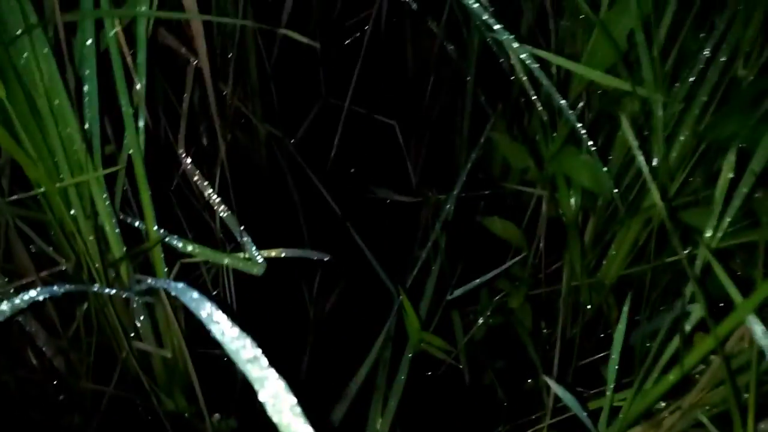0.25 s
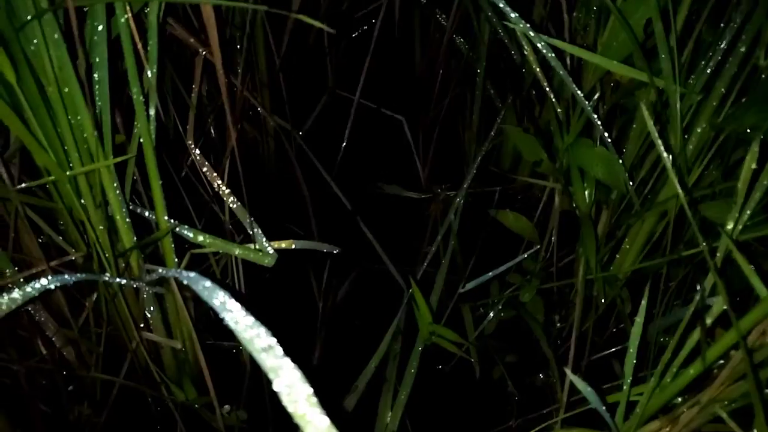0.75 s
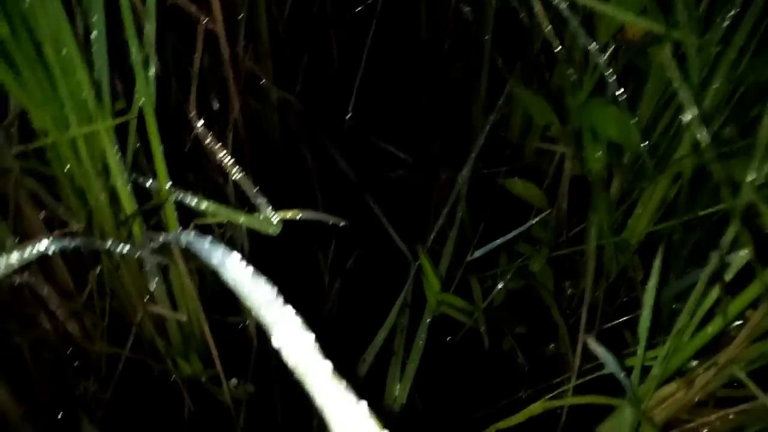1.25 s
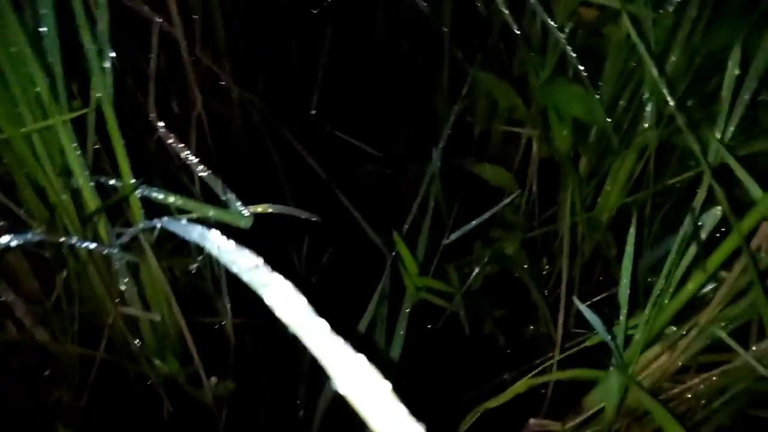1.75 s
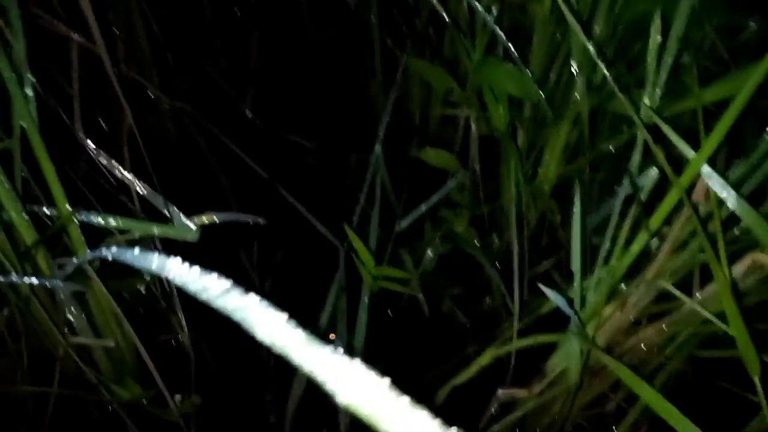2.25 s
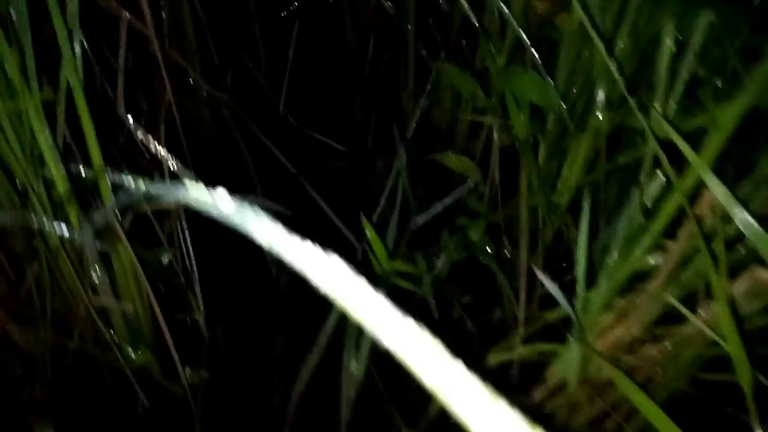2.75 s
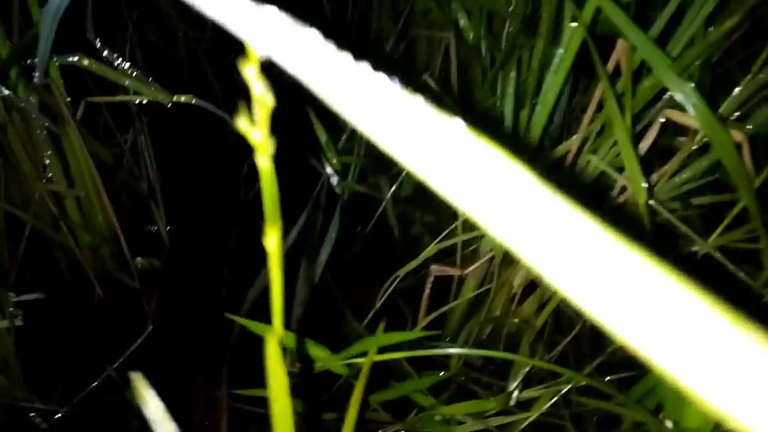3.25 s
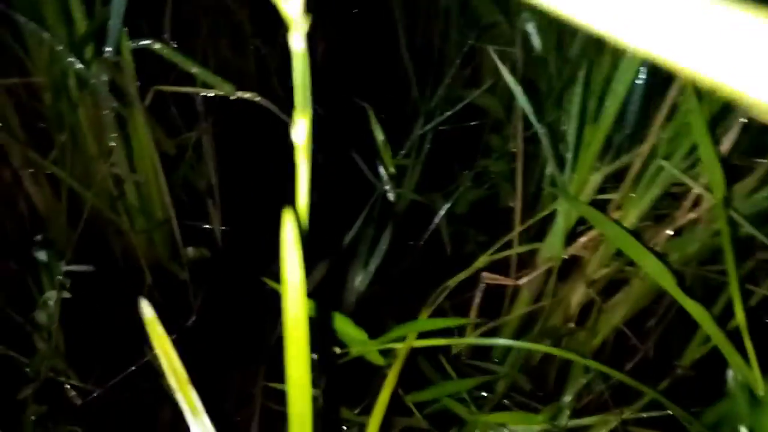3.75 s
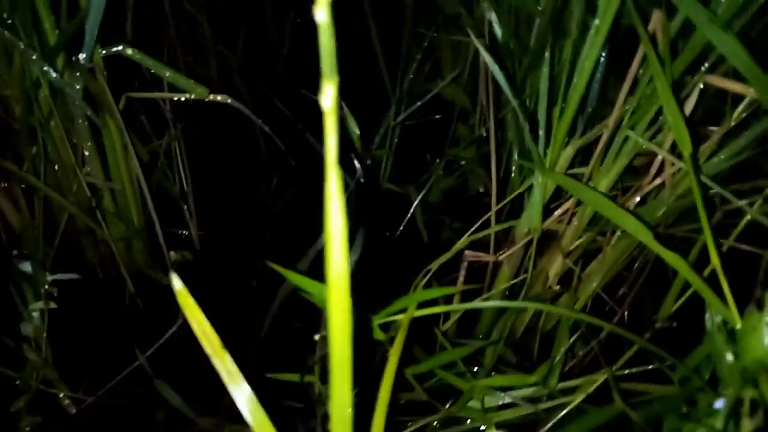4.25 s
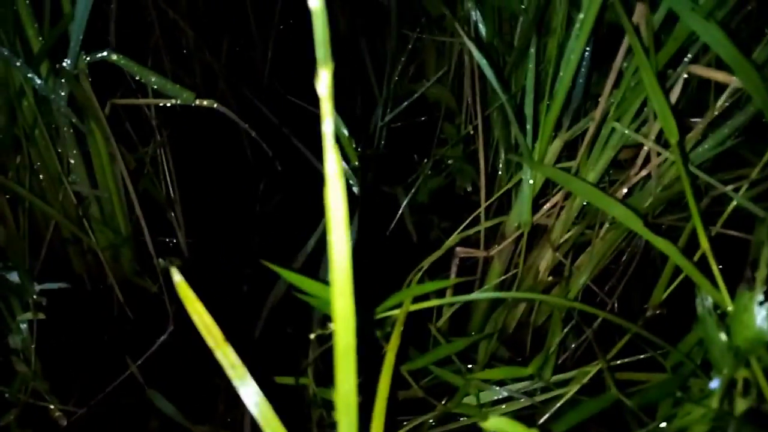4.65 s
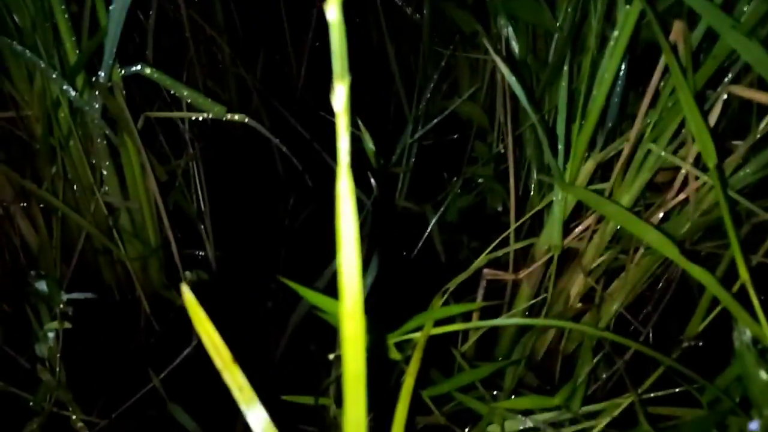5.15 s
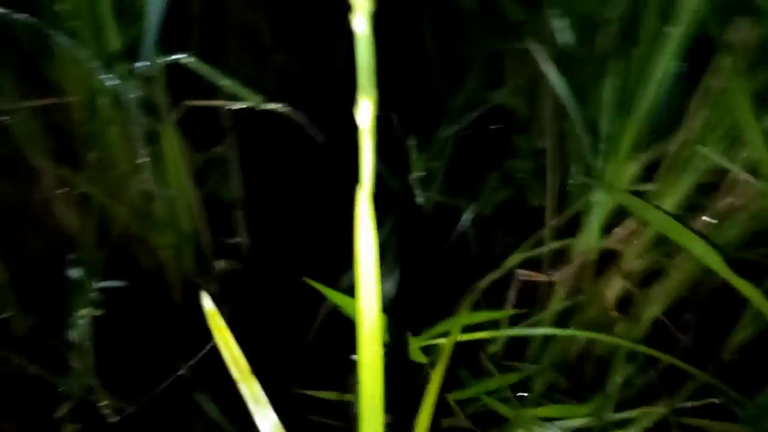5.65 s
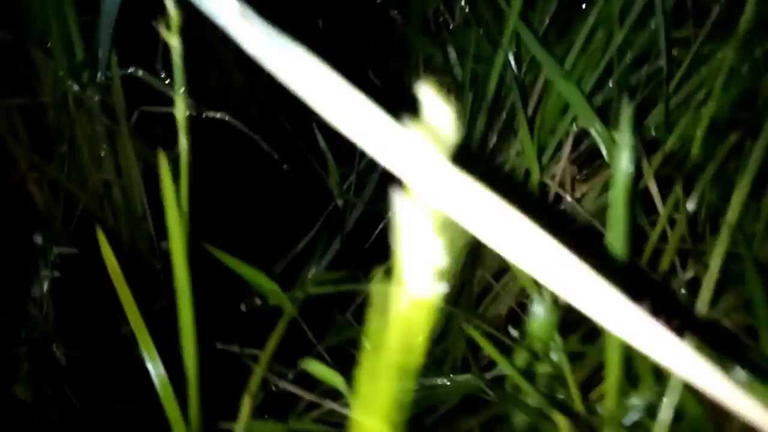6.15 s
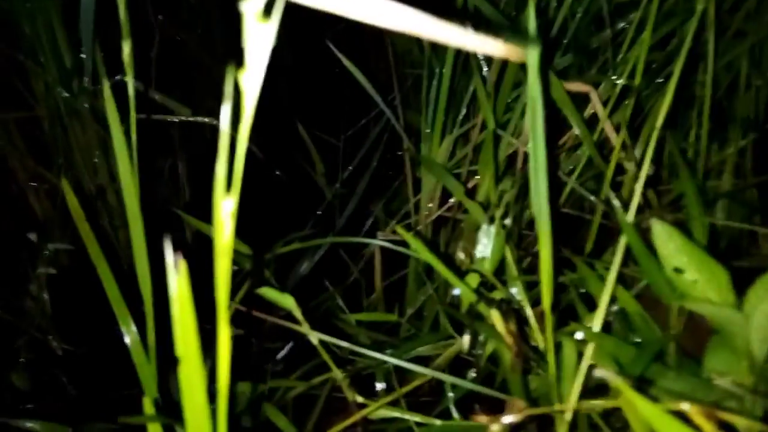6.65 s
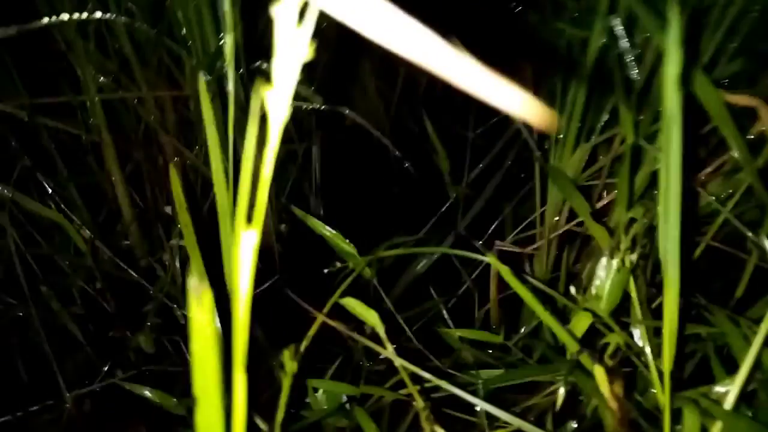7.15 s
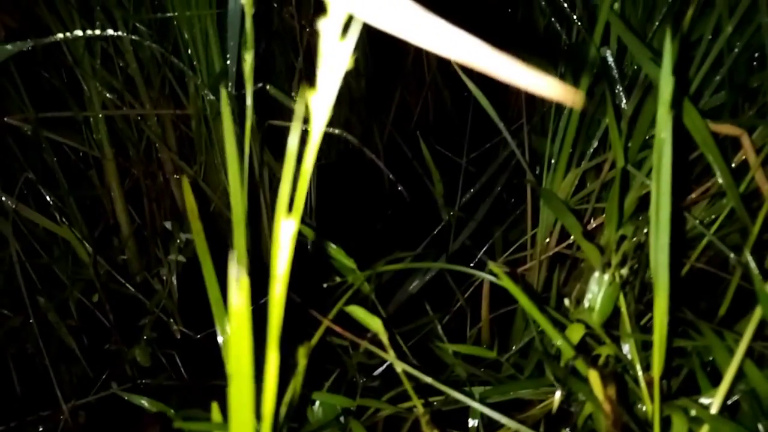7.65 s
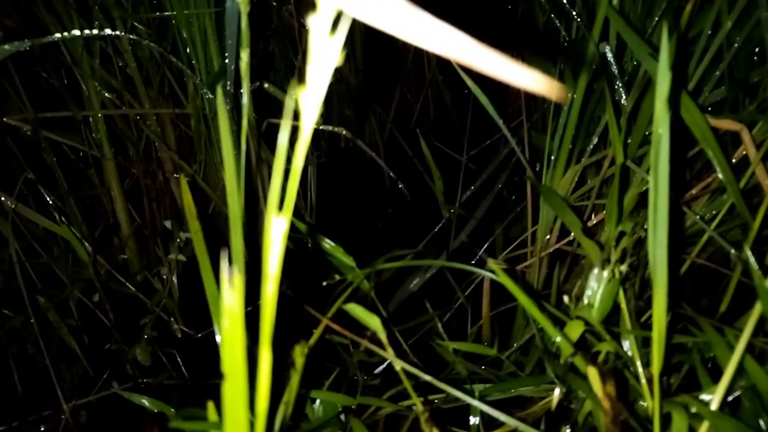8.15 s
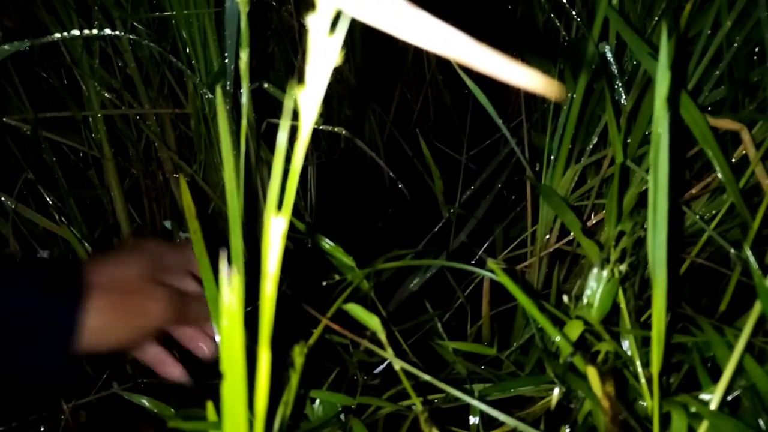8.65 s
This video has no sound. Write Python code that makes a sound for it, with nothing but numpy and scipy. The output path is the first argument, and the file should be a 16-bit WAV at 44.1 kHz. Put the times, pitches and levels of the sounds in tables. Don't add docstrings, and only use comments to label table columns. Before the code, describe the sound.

Open wet grass at night, quiet and dry. Throughout, a near cricket gives rapid, thin chirps around 7 kHz, nine per second, each a tiny six-pulse buzz, strongest at 1-3 seconds. Behind it lie a blurred far cricket chorus, softer trills and a dim wash with low, puffing hum. Buzzy frogs finish calling in the first half second. Blade clicks and swishes come near 0.1, 0.8 and 1.3, clustering at 1.6-1.8, with a dull tap at 1.3. At 3.9-4.5 a wet blade scrapes and slips in hollow, squeaky jerks, with two knocks around 4.4. The hardest knock lands at 5.56; a firm tap and drips at 6.25. Frogs croak again, rattling, at 6.3-7.4. A snap and light brushing at 8.2 continue to the end. The left is clear; the right is muffled, faint and hissy.

```python
import sys
import numpy as np
from scipy import signal
from scipy.fft import rfft, irfft, next_fast_len
from scipy.io import wavfile
from scipy.ndimage import uniform_filter1d

SR = 44100
rng = np.random.default_rng(int(sys.argv[2]) if len(sys.argv) > 2 else 0)


def invert_db(x):
    u = np.asarray(x, float) / 20
    return 10 ** u


def file_out(sig):
    cols = np.atleast_2d(sig).T
    lim = np.clip(cols, -1, 1)
    pcm = np.round(lim * 32767).astype(np.int16)
    wavfile.write(sys.argv[1], SR, pcm)


N = 392049


def evened(x):
    return x / np.sqrt(np.mean(x ** 2) + 1e-20)


def read(points, hz):
    f, value = np.transpose(points)
    return np.interp(np.log(hz + 1), np.log(f + 1), value)


def add(mix, s, sound):
    part = mix[..., round(s * SR):][..., :sound.shape[-1]]
    part += sound[..., :part.shape[-1]]


def wave(turns):
    return np.sin((2 * np.pi * (turns % 1)).astype(np.float32))


def resonate(x, modes):
    out = 0
    for k, (hz, width, db) in enumerate(modes):
        r = np.exp(-np.pi * width / SR)
        pole = [1, -r * np.exp(2j * np.pi * hz / SR)]
        ring = signal.lfilter([(1 - r) ** 2], np.convolve(pole, pole), x).real
        out = out + (-1) ** k * invert_db(db) * 2 * ring
    return out


def bouts(rows, rest_db, edge=.5, skew=1., column=2):
    t, power = np.arange(N) / SR, np.full(N, invert_db(2 * rest_db))
    for row in rows:
        start, length = row[:2]
        on = slice(max(round(start * SR), 0), round((start + length) * SR))
        u = np.clip((t[on] - start) / length, 0, 1) ** skew
        swell = np.sin(np.pi / 2 * np.clip(np.minimum(u, 1 - u) / edge, 0, 1)) ** 2
        power[on] += (invert_db(row[column]) * swell) ** 2
    return np.sqrt(power)


def noise(spectrum, patchy_db, size=1024):
    hz = np.fft.rfftfreq(size, 1 / SR)
    a, b, patches = rng.standard_normal((N // (size // 4) + 5, len(hz), 3)).T
    patches = evened(uniform_filter1d(uniform_filter1d(patches, 7, 0), 12, 1))
    z = (a + 1j * b) * invert_db(read(spectrum, hz)[:, None] + patchy_db * patches)
    return signal.istft(z, nperseg=size, noverlap=size * 3 // 4)[1][:N]


def field(x, t60, wet_db):
    t = np.arange(SR // 2) / SR
    taps = rng.choice([-1., 1.], len(t)) * (rng.random(len(t)) < .05)
    taps = taps * invert_db(-60 * t / t60) * (t > .003)
    return x + invert_db(wet_db) * signal.oaconvolve(x, taps / np.linalg.norm(taps))[:N]


def near_cricket():
    # (time [s], level [dB])
    chirp_rows = [(0.071, -44.5), (0.173, -46.5), (0.296, -43.5), (0.407, -43.5), (0.512, -44.0), (0.619, -42.0),
                  (0.723, -42.0), (0.833, -40.5), (0.948, -40.0), (1.058, -38.5), (1.179, -41.5), (1.286, -41.0),
                  (1.379, -42.5), (1.516, -40.0), (1.62, -38.5), (1.736, -39.0), (1.847, -40.0), (1.95, -39.0),
                  (2.062, -40.0), (2.175, -38.5), (2.289, -40.5), (2.389, -38.5), (2.503, -37.5), (2.618, -36.5),
                  (2.73, -38.5), (2.845, -41.5), (2.956, -43.0), (3.079, -40.0), (3.176, -39.5), (3.312, -42.5),
                  (3.405, -43.0), (3.553, -44.0), (3.645, -43.0), (3.766, -43.5), (3.851, -44.0), (3.957, -43.5),
                  (4.061, -44.0), (4.187, -44.0), (4.292, -46.5), (4.4, -44.0),
                  (4.515, -43.0), (4.622, -44.5), (4.729, -45.0), (4.836, -47.0), (4.948, -44.5), (5.063, -45.0),
            (5.187, -45.0), (5.312, -44.5), (5.416, -45.0), (5.552, -44.0), (5.669, -43.0), (5.752, -42.0),
            (5.861, -44.5), (5.979, -42.5), (6.091, -39.0), (6.206, -45.0), (6.312, -42.5), (6.433, -44.0),
            (6.543, -44.0), (6.647, -43.5), (6.761, -43.0), (6.878, -40.0), (6.985, -41.5), (7.101, -40.0),
            (7.224, -41.5), (7.329, -41.5), (7.434, -39.0), (7.569, -41.5), (7.668, -42.0), (7.783, -42.0),
            (7.897, -42.5), (8.013, -43.5), (8.117, -42.5), (8.224, -42.5), (8.356, -42.5), (8.452, -43.0),
            (8.568, -43.0), (8.683, -41.0), (8.8, -45.0)]
    stroke_db = [-6.5, -4.1, -4.2, -5, -4.8, -4.5]
    # (time [s], frequency [Hz])
    wing = [(0, 6955), (1.5, 6955), (3, 6960), (4.4, 6980), (5, 7040), (5.6, 6980), (7, 6970), (8.9, 6955)]
    strokes_per_s, chirp_db = 105, 5.4
    out, t = np.zeros(N), np.arange(round(SR / strokes_per_s)) / SR
    shape = np.sin(np.pi * (t * strokes_per_s) ** 0.78) ** 1.15
    sag_hz = 27000 * (t - t.mean())
    chirps = chirp_rows
    for (s, db), chance in zip(chirps, rng.standard_normal((len(chirps), 6, 3))):
        for k, (off, vary, turn) in enumerate(chance):
            hz = np.interp(s, *np.transpose(wing)) + 55 * off - sag_hz
            tone = np.sin(2 * np.pi * np.cumsum(hz) / SR + 3 * turn)
            tone += 0.022 * evened(resonate(rng.standard_normal(len(t)), [(7570, 810, 0)]))
            level = invert_db(db + chirp_db + stroke_db[k] + 1.9 * vary + 9)
            add(out, s + k / strokes_per_s + .0006 * turn, level * shape * tone)
    return field(out, 0.4, -13)


def brushing():
    # (start [s], length [s], low scrape [dB], swish [dB])
    brush = [(-.03, .1, -75, -53), (1.1, .32, -72, -64), (1.6, .32, -65, -59.5), (1.99, .2, -66, -63),
             (2.2, .16, -72, -65), (2.9, .45, -72, -72), (3.73, .11, -66, -58.5), (3.8, .85, -52, -70),
             (4.02, .08, -54, -72), (4.12, .09, -43, -62), (4.19, .1, -47.5, -66), (4.33, .09, -52, -64),
             (4.42, .06, -53, -70), (4.25, .12, -51, -72), (5.555, .14, -57, -66), (6.23, .08, -54, -63),
             (6.33, .5, -64, -66), (6.85, .12, -55, -58), (6.9, .35, -67, -63), (8.21, .04, -62, -60),
             (8.2, 1.1, -60, -63)]
    # (frequency [Hz], width [Hz], level [dB])
    hollow = [(982, 198, 9), (1680, 500, 0), (2650, 680, -18.5), (3600, 1280, -27)]
    skew = .7
    clumps_db = 3.26 * evened(uniform_filter1d(rng.standard_normal(N), 150))
    grains = rng.standard_normal(N) * invert_db(clumps_db)
    swish_band = signal.butter(4, [1800, 7400], "bandpass", fs=SR, output="sos")
    swish = signal.sosfilt(swish_band, grains)
    scrape_band = signal.butter(4, 5500, fs=SR, output="sos")
    scrape = signal.sosfilt(scrape_band, np.diff(resonate(grains, hollow), prepend=0))
    low = bouts(brush, -80, .5, skew) * invert_db(1.5)
    high = bouts(brush, -82, .5, skew, column=3) * invert_db(8)
    return evened(scrape) * low + evened(swish) * high


def slips():
    # (time [s], peak [dB], frequency [Hz], t60 [s])
    jerks = [(3.929, -51, 1070, .05), (3.948, -47, 1800, .05), (4.022, -44, 1600, .07),
             (4.042, -45, 1750, .06), (4.047, -41, 1060, .05), (4.068, -47, 2150, .06),
             (4.1, -46, 1860, .05), (4.118, -41, 965, .08), (4.136, -37, 1900, .06),
             (4.138, -45, 2650, .06), (4.143, -36, 980, .08), (4.153, -32, 1820, .07),
             (4.155, -33, 1080, .05), (4.161, -31, 1420, .04), (4.166, -25, 990, .08),
             (4.172, -36, 1750, .07), (4.18, -38, 960, .05), (4.212, -37, 1000, .1),
             (4.228, -41, 2050, .04), (4.232, -35, 950, .07), (4.271, -39, 960, .08),
             (4.278, -44, 1900, .05), (4.29, -40, 980, .07), (4.321, -38, 1050, .07),
             (4.33, -48, 2950, .05), (4.34, -42, 1000, .05), (4.325, -43, 1800, .09),
             (4.345, -44, 1900, .05), (4.365, -46, 1850, .08), (4.44, -45, 1900, .06),
             (4.48, -48, 930, .07), (4.511, -47, 1620, .05), (5.578, -42, 1500, .03),
             (6.262, -42, 1500, .04), (8.22, -44, 2230, .02), (8.621, -48, 2650, .03)]
    out, t = np.zeros(N), np.arange(3000) / SR
    for (s, db, hz, t60), puff in zip(jerks, rng.standard_normal((len(jerks), len(t)))):
        grit = evened(resonate(puff, [(hz, 450, -.5), (1.9 * hz, 900, -9)]))
        ring = np.sin(2 * np.pi * hz * t) + .6 * grit
        add(out, s, invert_db(db + 4.5 - 60 * t / t60) * ring * np.minimum(t / .005, 1))
    return out


def knocks():
    # (time [s], peak [dB], thud [Hz], click over the thud [dB])
    hits = [
        (0.824, -59, 182, -4),
        (1.333, -46, 452, -0.5),
        (4.358, -35, 450, 5),
        (4.43, -39, 430, 4),
        (4.51, -63, 385, -1.5),
        (5.557, -25.5, 463, 2),
        (5.582, -45, 330, -8),
        (6.268, -41, 440, 0.4),
        (8.719, -62, 194, -1.5),
    ]
    out, t = np.zeros((2, N)), np.arange(4000) / SR
    grip = np.minimum(t / .001, 1) * np.exp(-(t / .009) ** 2)
    for (s, db, hz, click_db), puff in zip(hits, rng.standard_normal((len(hits), len(t)))):
        thud = (np.sin(2 * np.pi * hz * t) + .38 * np.sin(2 * np.pi * 290 * t)) * grip
        thud -= 0.28 * np.sin(2 * np.pi * 205 * t) * invert_db(-60 * t / 0.1) * np.minimum(t / 0.009, 1)
        click = evened(resonate(puff, [(1550, 450, 4), (2600, 900, -5), (4400, 1500, -7)]))
        click = click * invert_db(click_db + 1.5 - 60 * t / .018)
        shell = np.sin(2 * np.pi * 1480 * t) * invert_db(click_db - 3.5 - 60 * t / .03)
        muffled = evened(resonate(puff, [(1990, 870, 0)])) * invert_db(click_db - 23.5 - 60 * t / 0.044)
        add(out[0], s, invert_db(db) * (thud + click + shell))
        add(out[1], s + .0006, invert_db(db) * (thud + .3 * shell + muffled))
    return signal.sosfilt(signal.butter(2, 90, "highpass", fs=SR, output="sos"), out)


def drips():
    # (time [s], peak [dB], frequency [Hz])
    drops = [(0.639, -60.5, 670), (0.948, -55, 730), (2.564, -71, 695), (3.289, -61.5, 653),
             (5.031, -63, 995), (5.727, -57.5, 1540), (6.234, -42, 1200), (6.245, -49, 1100),
             (6.45, -55, 1710), (6.618, -56.5, 1050), (8.331, -57, 796)]
    out, t = np.zeros(N), np.arange(1500) / SR
    for s, db, hz in drops:
        ring = np.sin(2 * np.pi * hz * t) * np.minimum(t / 0.0014, 1)
        add(out, s, invert_db(db + 10.5 - 60 * t / 0.045) * ring)
    return out


def snapping_blades():
    # (time [s], peak [dB], frequency [Hz], crisp top [dB])
    snaps = [(0.0094, -53, 5590, -65), (0.108, -48, 5220, -70), (0.8, -49, 5490, -68),
             (0.917, -50, 5270, -69), (1.271, -54, 4060, -72), (1.2825, -48, 4060, -67),
             (1.5684, -62, 3650, -76), (1.659, -50, 5600, -69.5), (1.667, -40, 5460, -60),
             (1.68, -50, 5000, -64), (1.7094, -53, 5130, -70), (1.7315, -52, 5470, -66),
             (1.7694, -54, 5350, -69), (1.7994, -44, 4900, -62), (1.8174, -44, 4940, -64),
             (2.0213, -61, 3600, -73.5), (2.0594, -49, 4730, -74.5), (2.128, -51, 4530, -77),
             (2.2458, -57, 5290, -69), (2.731, -49, 4670, -69.5), (3.7454, -49, 5000, -63),
             (3.766, -49, 5000, -70), (4.0302, -46, 5480, -74.5), (4.357, -52, 5500, -66),
             (4.7666, -43, 5260, -96), (4.847, -70, 5200, -78), (5.6176, -45, 3630, -95),
             (6.9544, -57, 4420, -68), (7.1365, -59, 4180, -70), (8.2192, -44, 4200, -70),
             (8.275, -62, 5140, -71), (8.329, -52, 5100, -75.5), (8.359, -56, 3620, -83)]
    out, t = np.zeros(N), np.arange(1500) / SR
    for (s, db, hz, top_db), puff in zip(snaps, rng.standard_normal((len(snaps), len(t)))):
        crack = evened(resonate(puff, [(hz, 1900, -.5), (2500, 1200, -16)]))
        crisp = evened(resonate(puff, [(9000, 1800, -.5), (12000, 2500, -7), (14800, 1500, -7)]))
        add(out, s, invert_db(db + 3.5 - 60 * t / .025) * crack)
        crackle = invert_db(top_db + 5) * np.exp(-((t - .015) / .009) ** 2) * crisp
        add(out, max(s - .009, 0), crackle)
    return out


def frogs():
    # (start [s], length [s], effort [dB], attack [s], release [s])
    calls = [
        (-.05, .49, -47.5, .14, .09),
        (-.1, .49, -51.5, .03, .07),
        (6.33, .425, -45, .13, .025),
        (6.875, .445, -48.5, .04, .02),
        (6.84, .29, -55.5, .03, .04),
        (.36, .23, -61, .04, .06),
        (6.97, .35, -61, .14, .02),
        (7.29, .12, -58, .02, .05),
        (6.72, .17, -54, .02, .13),
    ]
    # (frequency [Hz], width [Hz], level [dB])
    sacs = [
        [(3110, 320, 0), (2650, 200, -14), (5200, 600, -20)],
        [(2480, 300, 0), (4950, 600, -20)],
        [(3140, 310, 0), (2480, 400, -14), (5250, 650, -18)],
        [(2165, 110, 0), (2450, 330, -14), (4200, 220, -21)],
        [(1760, 160, 0), (880, 150, -10)],
        [(3020, 220, 0), (2660, 60, -3)],
        [(4200, 200, 0), (2560, 200, -3)],
        [(2157, 70, 0), (2500, 200, -10)],
        [(3150, 350, 0), (2450, 300, -6)],
    ]
    # (first rate [Hz], settled rate [Hz], settling [s])
    pulses = [(134, 148.7, .19), (140, 157, .24), (136, 148.2, .13), (123.8, 120.2, .2), (42, 46, .12),
              (148.2, 147.8, .1), (121.8, 120.2, .1), (119.9, 119.9, .1), (147, 147, .1)]
    rough = [(.008, .65), (.008, .6), (.005, .6), (.003, .35), (.5, 2.2), (.004, .6), (.004, .4),
             (.004, .3), (.01, .8)]
    sag_hz_per_s, flutter_db = 2, 1.8
    out = np.zeros(N)
    for call, sac, (first, settled, settle_s), (jitter, breath) in zip(calls, sacs, pulses, rough):
        s, length, effort_db, attack, release = call
        t = np.arange(max(-s, 0), length, 1 / SR)
        rate = first + (settled - first) * np.minimum(t / settle_s, 1)
        rate -= sag_hz_per_s * np.maximum(t - settle_s, 0)
        rate *= 1 + jitter * evened(uniform_filter1d(rng.standard_normal(len(t)), 300))
        harmonics = np.arange(1000 // rate[0], 6500 // rate[0])
        phase = 2 * np.pi * np.cumsum(rate) / SR
        train = sum(np.cos(k * phase) for k in harmonics)
        breathy = breath * rng.standard_normal(len(t))
        swell = np.clip(np.minimum(t / attack, (length - t) / release), 0, 1) ** 1.5
        swell *= invert_db(flutter_db * evened(uniform_filter1d(rng.standard_normal(len(t)), size=700)))
        voice = evened(resonate(evened(train) + breathy, sac))
        add(out, max(s, 0), invert_db(effort_db + 4.0) * voice * swell)
    return field(out, .4, -9)


def singers(hz, spread, strokes_per_s, bouts_per_s, duty, count):
    slow, out = np.arange(0, N, 32) / SR, np.zeros(N)
    sway = wave(.21 * slow + rng.random())
    for a, (b, c, d, e) in zip(np.linspace(-1, 1, count), rng.standard_normal((count, 4))):
        drift = evened(uniform_filter1d(rng.standard_normal(len(slow)), size=14))
        wander = wave(.4 * (1 + .3 * b) * slow + d)
        pitch = hz + spread * (a + .7 * wander + .35 * sway + 1.2 * drift)
        tone = wave(np.cumsum(np.repeat(pitch, 32)[:N]) / SR)
        strokes = wave((strokes_per_s * (1 + .08 * b) * slow + c) / 2) ** 2
        bout = np.clip(4 * (wave(bouts_per_s * (1 + .12 * d) * slow + e) + duty), 0, 1)
        out += tone * uniform_filter1d(np.repeat(strokes * bout, 32)[:N], size=32)
    return evened(out)


def far_chorus():
    # (wing tone [Hz], spread [Hz], level [dB])
    kinds = [(6100, 90, -8), (6260, 90, 8.5), (6550, 110, 9.5), (6740, 120, 11), (6990, 160, 6)]
    # (start [s], length [s], level [dB])
    swells = [
        (1.5, 1.7, -57),
        (3.95, .5, -55),
        (4.68, .12, -52),
        (5.28, .15, -54),
        (5.96, .11, -48),
        (6.78, .13, -52),
        (7.65, .16, -52),
        (8.32, .4, -55),
    ]
    far = sum(invert_db(db) * singers(hz, spread, 100, 8.5, .45, count=6) for hz, spread, db in kinds)
    path_phase = 2 * np.pi * .6 * np.arange(N) / SR
    one_path = field(far * np.cos(path_phase), .15, 0) * np.cos(path_phase)
    other_path = field(far * np.sin(path_phase), .15, 0) * np.sin(path_phase)
    return evened(one_path + other_path) * bouts(swells, -50) * invert_db(7.5)


def trillers():
    # (tone [Hz], spread [Hz], pulse rate [1/s], resting level [dB])
    groups = [(2170, 40, 45, -73), (3455, 70, 95, -65), (4800, 260, 90, -70.5), (800, 120, 22, -77),
              (8250, 260, 120, -95)]
    # (start [s], length [s], level [dB])
    group_bouts = [
        [(-.3, 3.7, -63.5), (3.9, .8, -66), (5.6, .55, -62), (6.15, 1.25, -64), (7.4, .45, -63),
         (8.15, 1.1, -66)],
        [(-.3, .85, -61), (.6, 3.75, -62), (4.75, 2.6, -61), (7.2, 2.1, -61)],
        [(-.3, 2.9, -69), (6.3, .9, -70), (8.0, 1.2, -67)],
        [(0, .35, -68), (.55, 1.8, -70.5), (3.0, .9, -69), (4.1, .8, -70), (5.95, 1.5, -66), (8.25, .9, -68)],
        [(-.2, .75, -81), (6.05, 1.2, -82), (7.25, 1.2, -81)],
    ]
    out = np.zeros(N)
    for (hz, spread, rate, rest_db), rows in zip(groups, group_bouts):
        group = evened(field(singers(hz, spread, rate, 3.5, 1.1, count=4), 0.09, 4.9))
        out += group * bouts(rows, rest_db, edge=.15) * invert_db(4.5)
    return out


def gusts():
    # (middle [s], level [dB])
    puffs = [(.03, -61), (.32, -60), (.6, -60), (.83, -57), (.97, -57), (1.22, -58), (1.45, -62),
             (1.64, -59), (1.88, -60), (2.02, -59), (2.27, -58), (2.52, -62), (2.78, -59), (2.98, -57),
             (3.25, -57), (3.71, -58), (3.96, -58), (4.3, -58), (4.62, -59), (5.1, -61), (5.92, -61),
             (6.23, -56), (6.58, -57), (6.92, -59), (7.15, -60), (7.35, -60), (7.6, -61), (8.05, -62),
             (8.64, -57), (8.84, -59)]
    # (frequency [Hz], level [dB])
    low_hum = [(25, -42.5), (50, -19), (110, 2.5), (200, -6), (300, -18.5), (600, -32.5), (1500, -110)]
    puff_s = .24
    level = bouts([(s - puff_s / 2, puff_s, db) for s, db in puffs], -66)
    hum = evened(noise(low_hum, 2.5, size=2048)) * level * invert_db(3.5)
    rub = evened(noise(low_hum, 4.9, size=2048)) * level * invert_db(-4.5)
    return hum, rub


def night_wash():
    # (frequency [Hz], level [dB a bin])
    wash = [(40, -69), (300, -61), (480, -53), (580, -63.5), (750, -59.5), (1200, -61.5), (2700, -68.5),
            (4000, -67), (5500, -63), (7600, -61), (8300, -79), (9200, -83), (16000, -99)]
    return noise(wash, 4.8) / 8


def through_ports(air):
    # (frequency [Hz], gain [dB])
    dip = [(3600, -0.14), (4050, -3), (4500, 0.23)]
    # (frequency [Hz], gain [dB])
    cover = [(60, -11.5), (250, -16.5), (560, -13.5), (1000, -24.5), (2200, -38.5), (3200, -31),
             (4000, -50), (6700, -45), (6980, -38.5), (7300, -52.5), (12000, -53)]
    # (frequency [Hz], level [dB a bin])
    hiss = [(40, -91.5), (200, -76), (500, -74), (1500, -78.5), (5000, -79.5), (7100, -92.5), (8000, -104),
            (9500, -89.5), (13500, -91), (15000, -83), (16000, -95)]
    late_s = 65 / SR
    size = next_fast_len(N)
    hz = np.fft.rfftfreq(size, 1 / SR)
    spectrum = rfft(air, size)
    delay = np.exp(-2j * np.pi * hz * late_s)
    covered = irfft(spectrum * invert_db(read(cover, hz)) * delay, size)[:N]
    left = irfft(spectrum * invert_db(read(dip, hz)), size)[:N]
    return np.array([left, covered + noise(hiss, 1.3) / 8])


def drop_weak(x, floor_db, above_hz):
    hz, t, z = signal.stft(x, SR, nperseg=1024)
    power = uniform_filter1d(uniform_filter1d(abs(z) ** 2, size=9, axis=0), size=2, axis=1)
    band_db = 10 * np.log10(power + 1e-20)
    keep = (band_db > floor_db) | (hz[:, None] < above_hz)
    return signal.istft(z * keep, SR, nperseg=1024)[1][:N]


def scene():
    hum, rub = gusts()
    air = near_cricket() + brushing() + slips() + drips() + snapping_blades()
    air += frogs() + far_chorus() + trillers() + hum + night_wash()
    ports = through_ports(air)
    ports[1] += rub
    return ports + knocks()


def top_cut(x):
    return signal.sosfilt(signal.butter(12, 15500, fs=SR, output="sos"), x)


def record(dry):
    # (frequency [Hz], level [dB a bin])
    top_hiss = [(13200, -130), (14200, -100), (15200, -83), (16000, -99)]
    left = drop_weak(dry[0], -92, 7400) + noise(top_hiss, 2.5) / 8
    right = drop_weak(dry[1], -119, 7200)
    return top_cut(np.array([left, right]))


dry = scene()
out = record(dry)
file_out(out)
```